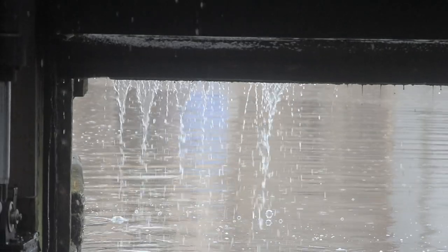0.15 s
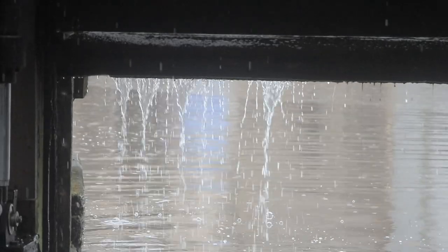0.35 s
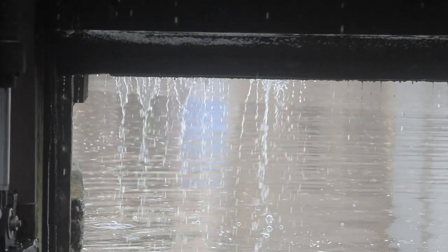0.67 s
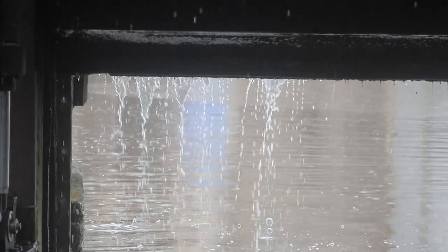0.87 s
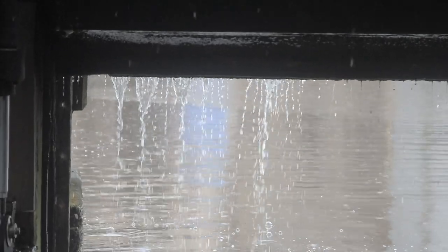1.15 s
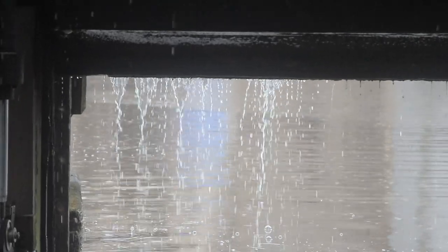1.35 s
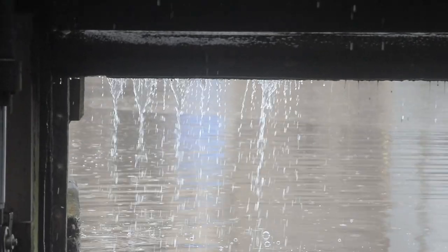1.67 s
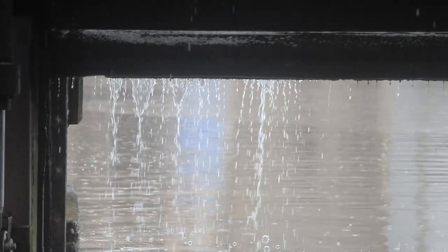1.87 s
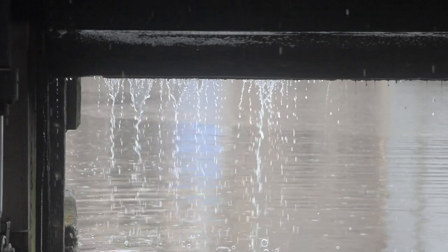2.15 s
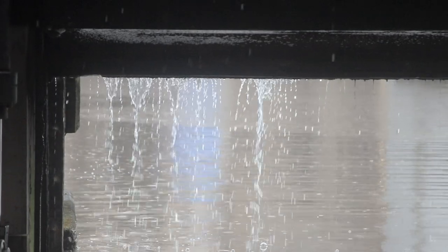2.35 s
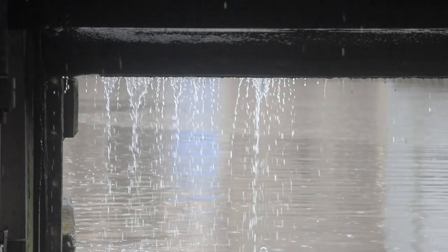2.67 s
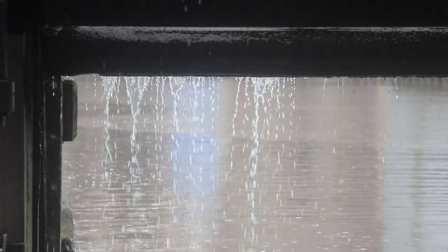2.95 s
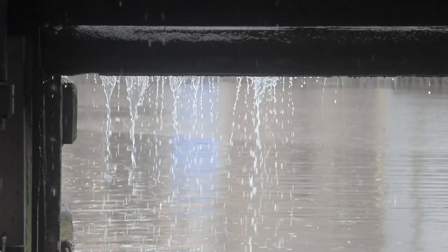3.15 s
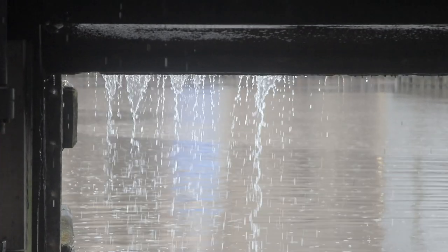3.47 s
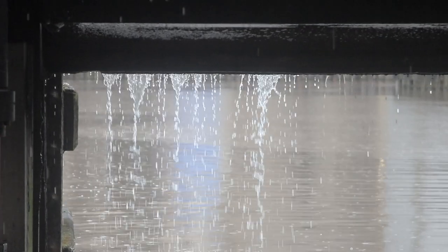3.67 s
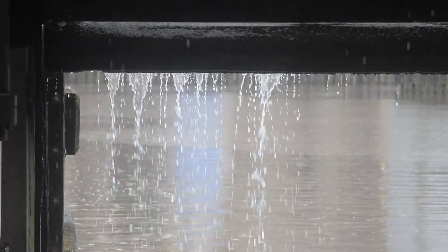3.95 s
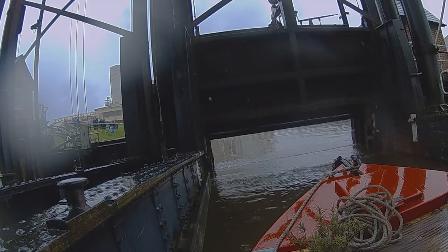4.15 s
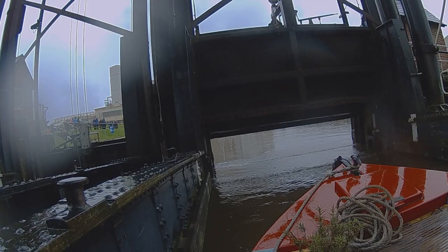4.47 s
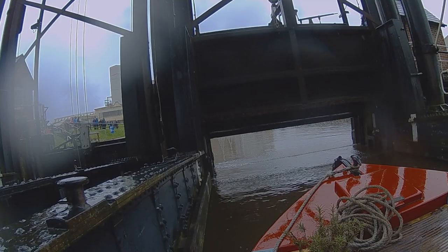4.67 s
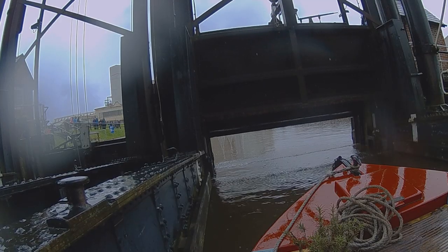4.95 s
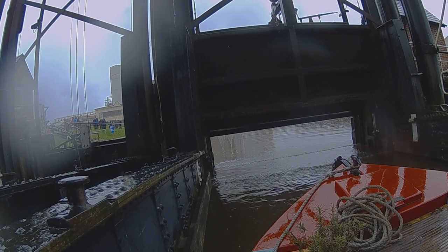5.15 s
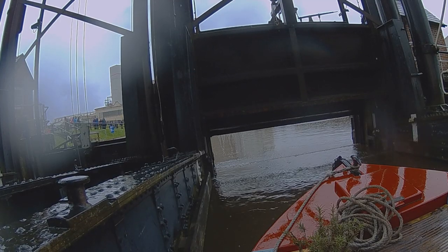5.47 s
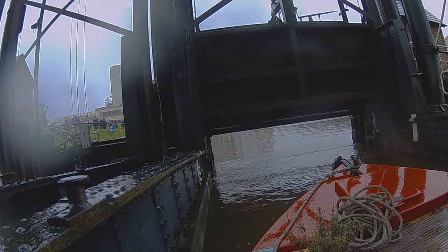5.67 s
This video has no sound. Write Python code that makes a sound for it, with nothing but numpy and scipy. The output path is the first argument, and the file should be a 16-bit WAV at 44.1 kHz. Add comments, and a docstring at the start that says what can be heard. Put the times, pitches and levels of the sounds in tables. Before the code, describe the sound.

Outdoors in rain, a close microphone hears water falling off a gate as a dense, continuous rush with fizzing spray. A tonal machine whine and drone swell gently beneath, with deep soft rumbles and scattered sharp drop clicks. At about 4.1 seconds the level drops instantly; from the deck there remain muffled water, thin rain hiss and a faint steady hum until the end.

```python
"""Lock gate and boat's deck, in the rain

Close to the raised gate, water streams into the river: shaped noise gives roar and spray, short rings bubbles.
The microphone then cuts to a deck further back: a dull wash under fine rain, both shaped noise.
Hydraulic pump and motor hum in both places as sums of sines, over deep noise of unsteady level.
Near drops land as cracks, rings and spatter; a faint electrical whistle is one fluttering sine.
"""
import sys
import numpy as np
from scipy import signal
from scipy.fft import rfft, irfft, next_fast_len
from scipy.io import wavfile
from scipy.ndimage import uniform_filter1d, map_coordinates

SR = 44100
rng = np.random.default_rng(int(sys.argv[2]) if len(sys.argv) > 2 else 0)


def materialize(psi):
    """Save the field psi as 16-bit PCM at rate SR to the path in sys.argv[1].

    A 1-D psi becomes a single channel; in a 2-D psi each row is a channel.
    """
    bounded = np.clip(np.atleast_2d(psi).T, -1, 1)
    quanta = np.round(bounded * 32767).astype(np.int16)
    wavfile.write(sys.argv[1], SR, quanta)


N = 255780
T = np.arange(N) / SR  # seconds

CUT_S = 4.143  # the microphone jumps from the gate to the deck
PUMP_HZ, MAINS_HZ = 246.77, 49.98  # piston rate of the pump; mains frequency at the motor
TOP_HZ = 15720  # band limit of the microphone signal

# Spectrum of the water's roar close to the gate. Each row: frequency in Hz, relative density in dB per Hz.
ROAR_SPECTRUM = [(60, -33), (85, -11), (108, -4.5), (130, -4), (175, -1), (220, 1.5), (290, -3),
                 (420, -9.5), (800, -11.5), (1300, -15), (2000, -37), (4000, -84)]
# Spectrum of the spray close to the gate. Each row: frequency in Hz, relative density in dB per Hz.
SPRAY_SPECTRUM = [(500, -46), (1000, -13), (1500, -0.5), (1900, -3), (2700, -3.5), (3300, -7), (5500, -9.5),
                  (6900, -11.5), (8500, -10), (10700, -19.5), (13700, -19), (14500, -28), (16000, -23)]
# Spectrum of the water's wash from the deck. Each row: frequency in Hz, relative density in dB per Hz.
WASH_SPECTRUM = [(40, -30), (85, -7.5), (165, 0.5), (280, -0.5), (380, -8), (560, -5.5), (850, -7),
                 (1150, -9.5), (1450, -20.5), (2500, -51), (5000, -90)]
# Spectrum of the rain from the deck. Each row: frequency in Hz, relative density in dB per Hz.
RAIN_SPECTRUM = [(800, -21), (1500, 0), (2450, -4.5), (3000, -13), (3800, -6), (4900, -13), (5500, -9.5),
                 (7000, -12), (8200, -21), (10200, -21), (11700, -16.5), (12700, -29), (15500, -25)]
# Drops near the microphone.
# Each row: start in seconds, peak of the ring in dB, pitch in Hz, splash against the ring in dB.
NEAR_DROPS = [(.165, -29, 6800, -9), (0.4187, -22.5, 2900, -10), (.4215, -26, 5000, -9),
              (.426, -23, 3400, -14), (1.2077, -23, 7550, -16), (1.243, -30.5, 3200, -7),
              (1.665, -23.5, 1450, -14), (2.1885, -26, 6500, -18), (2.2226, -22, 4300, -8),
              (2.2228, -24, 8000, -16), (2.8623, -23.5, 3250, -11), (2.8658, -20, 1450, -13),
              (2.8665, -31, 9000, -12), (3.4525, -28, 12700, -18), (3.508, -27.5, 5800, -10),
              (4.6183, -32.5, 2710, -17), (4.655, -45, 2100, -8), (5.53, -45, 12000, -16)]
# Steady harmonics of the pump. Each row: multiple of the piston rate, level at the gate in dB, on deck in dB.
PUMP_HARMONICS = [(1, -41, -38.7), (2, -49, -55.5), (4, -53.5, -64), (5, -53.5, -63.5)]
# Magnetic hum and whine of the motor. Each row: multiple of the mains, level at the gate in dB, on deck in dB.
MOTOR_LINES = [(8, -58, -64), (12, -49, -58), (14, -57, -66), (18, -53, -55), (19, -57, -66),
               (48, -60, -76), (54, -62, -79), (132, -66, -81), (144, -63, -80), (150, -66, -90),
               (156, -67, -83), (192, -66, -92), (204, -71, -91), (246, -74, -95)]
# Spectrum of the deep noise. Each row: frequency in Hz, relative density in dB per Hz.
DEEP_SPECTRUM = [(10, -24), (25, -15), (40, -8), (57, 0.5), (75, -11.5), (100, -12), (200, -43),
                 (500, -100)]
# Swells in the level of the deep noise. Each row: time of the peak in seconds, rise in dB.
DEEP_SWELLS = [(.9, 4), (1.97, 7), (3.88, 6.5), (5.57, 9)]


def gate_water():
    """Close to the gate, streams break up on the river: roar, spray, ringing bubbles and ticks of single drops."""
    roar_db = -31 + 0.59 * wobble(7.14)
    roar = amp(roar_db) * coloured(churn(patchy_db=0.28), ROAR_SPECTRUM)

    impacts = patter(rate=1500, spread_db=1.5, t60=.003)
    spray_db = -36.5 + 0.32 * wobble(14)
    spray = amp(spray_db) * coloured(churn(patchy_db=1.0) + amp(-6.5) * impacts, SPRAY_SPECTRUM)

    plinks = bubbles(rate=320, centre_hz=2108, octaves=.65, cycles=14.0, spread_db=4.0, rise=0.12)
    fizz = bubbles(rate=400, centre_hz=5570, octaves=0.555, cycles=12.5, spread_db=3.5, rise=.05)
    ticks = patter(rate=25, spread_db=3, t60=.007)
    return roar + spray + amp(-46.0) * plinks + amp(-50.5) * fizz + amp(-59.5) * ticks


def deck_water():
    """From the deck further back, the streams are a dull wash with fine rain over it."""
    wash_db = -41.5 + 0.77 * wobble(4.5)
    wash = amp(wash_db) * coloured(churn(patchy_db=1.0), WASH_SPECTRUM)
    impacts = patter(rate=900, spread_db=3.5, t60=.003)
    rain = coloured(churn(patchy_db=1.2) + amp(-8.5) * impacts, RAIN_SPECTRUM)
    return wash + amp(-52) * rain


def near_drops():
    """A drop lands close by: a crack, a short ring, then droplets spatter around the same pitch."""
    crack_db, crack_t60_s, crack_hz = -6, 0.0069, 8000  # level before its treble rolls off at crack_hz
    ring_cycles = 30  # the ring dies by 60 dB in this many cycles
    splash_t60_s, splash_octaves = 0.091, 0.64  # life, and half-width of the band
    spatter_db, spatter_rate = 4, 700  # scatter of the spatter's level, random levels a second
    out, t = np.zeros(N + SR), np.arange(SR // 8) / SR
    for start_s, db, pitch_hz, splash_db in NEAR_DROPS:
        crack = filtered(rng.standard_normal(len(t)), lambda hz: 1 / np.hypot(1, (hz / crack_hz) ** 2))
        crack = crack * amp(crack_db - 60 * t / crack_t60_s)

        ring = np.sin(2 * np.pi * pitch_hz * t) * amp(-60 * pitch_hz * t / ring_cycles)

        droplet_db = spatter_db * map_coordinates(rng.standard_normal(len(t)), [t * spatter_rate])
        spatter = rng.standard_normal(len(t)) * amp(droplet_db)
        band = lambda hz: np.exp(-(np.log2((hz + 1) / pitch_hz) / splash_octaves) ** 2)
        splash = unit(filtered(spatter, band)) * amp(splash_db - 60 * t / splash_t60_s)

        out[round(start_s * SR):][:len(t)] += amp(db) * (crack + ring + splash)
    return out[:N]


def pump(at_gate):
    """The pump whines on its third piston harmonic, swelling and throbbing, over steadier harmonics."""
    whine_db = heard(at_gate, -28.5, -40) + swell(peak_s=2.17, length_s=6.5, depth_db=4.5)
    throb_db = 0.5 * np.sin(2 * np.pi * 2.67 * T)
    out = tone(3 * PUMP_HZ, whine_db + throb_db, waver_db=0.2, drift=.04)
    for order, gate_db, deck_db in PUMP_HARMONICS:
        out += tone(round(order) * PUMP_HZ, heard(at_gate, gate_db, deck_db), waver_db=0.3, drift=0.063)
    return out


def motor(at_gate):
    """The motor drones on the sixth and seventh multiples of the mains, in one deep swell, over weaker lines."""
    drone_db = heard(at_gate, -27.5, -39.5) + swell(peak_s=3.12, length_s=6.8, depth_db=18)
    upper_db = drone_db + heard(at_gate, -7.5, -16)
    out = tone(6 * MAINS_HZ, drone_db, waver_db=0.15, drift=0.046)
    out += tone(7 * MAINS_HZ, upper_db, waver_db=0.1, drift=0.055)
    for order, gate_db, deck_db in MOTOR_LINES:
        level_db = heard(at_gate, gate_db, deck_db)
        out += tone(round(order) * MAINS_HZ, level_db, waver_db=1.5, drift=0.38 + order / 150)
    return out


def deep_noise(at_gate):
    """Deep noise of unsteady level, far stronger at the gate."""
    width_s = 0.1  # from a swell's peak to 1/e of its rise in dB, either side
    swell_db = sum(db * np.exp(-((T - s) / width_s) ** 2) for s, db in DEEP_SWELLS)
    level_db = heard(at_gate, -43, -56.5) + swell_db + 1.1 * wobble(6.1)
    return amp(level_db) * coloured(rng.standard_normal(N), DEEP_SPECTRUM)


def thin_whistle():
    """A faint electrical whistle: one high sine whose level flutters fast."""
    flutter = 1 + .7 * np.sin(2 * np.pi * 54 * T)
    return flutter * tone(13750, -74, waver_db=.3, drift=.1)


def churn(patchy_db):
    """Churned water: noise whose bands swell and sink in small patches of time and frequency."""
    z = signal.stft(rng.standard_normal(N), nperseg=512)[2]
    field = uniform_filter1d(rng.standard_normal(z.shape), size=12, axis=0)  # across frequency
    field = uniform_filter1d(field, size=9, axis=1)  # across time
    return unit(signal.istft(z * amp(patchy_db * unit(field)), nperseg=512)[1][:N])


def patter(rate, spread_db, t60):
    """Impacts of drops, rate a second: tiny broadband cracks that die by 60 dB in t60 seconds."""
    count, t = int(rate * N / SR), np.arange(SR // 150) / SR
    cracks = amp(-60 * t / t60) * rng.standard_normal((count, len(t)))
    return scatter(sizes(count, spread_db) * cracks)


def bubbles(rate, centre_hz, octaves, cycles, spread_db, rise):
    """Trapped air rings for some cycles, its pitch rising as it nears the surface."""
    count, t = int(rate * N / SR), np.arange(SR // 50) / SR
    hz = np.clip(centre_hz * 2 ** (octaves * rng.standard_normal((count, 1))), 400, 11000)
    age = hz * t / cycles
    phase = 2 * np.pi * hz * t * (1 + rise * np.minimum(age, 2) / 2)
    envelope = np.exp(-2 * age) * (1 - np.exp(-2 * hz * t))  # decay, softened onset
    return scatter(sizes(count, spread_db) * np.sin(phase) * envelope)


def sizes(count, spread_db):
    """Gains for many small drops and few large ones."""
    return amp(spread_db * np.minimum(rng.exponential(size=(count, 1)), 4))


def scatter(grains):
    """Each row is dropped at a random moment; rms 1."""
    at = rng.integers(0, N, len(grains))[:, None] + np.arange(grains.shape[1])
    return unit(np.bincount(at.ravel(), grains.ravel(), N)[:N])


def tone(hz, db, waver_db, drift):
    """One sine at an rms level in dB, slightly unsteady in level and phase (drift in radians)."""
    phase = 2 * np.pi * (hz * T + rng.random()) + drift * wobble(3.94)
    return np.sqrt(2) * amp(db + waver_db * wobble(6)) * np.sin(phase)


def swell(peak_s, length_s, depth_db):
    """Level in dB of one smooth rise and fall: 0 at its peak, depth_db lower outside it."""
    rise = np.cos(np.pi * np.clip((T - peak_s) / length_s, -.5, .5)) ** 2
    return 20 * np.log10(rise + (1 - rise) * amp(-depth_db))


def heard(at_gate, gate_db, deck_db):
    """Level in dB where the microphone stands: at_gate is 1 at the gate, 0 on deck."""
    return deck_db + at_gate * (gate_db - deck_db)


def wobble(rate):
    """A smooth random curve, rate knots a second."""
    return map_coordinates(rng.standard_normal(int(N * rate / SR) + 4), [T * rate])


def coloured(x, spectrum):
    """x shaped by (Hz, dB) points on a log axis, at rms 1."""
    f, db = np.transpose(spectrum)
    return unit(filtered(x, lambda hz: amp(np.interp(np.log(hz + 1), np.log(f), db))))


def filtered(x, response):
    """x with its spectrum multiplied by a function of frequency in Hz."""
    m = next_fast_len(len(x) + 8192)
    return irfft(rfft(x, m) * response(np.fft.rfftfreq(m, 1 / SR)), m)[:len(x)]


def unit(x):
    """x scaled to rms 1."""
    return x / np.sqrt(np.mean(x ** 2) + 1e-20)


def amp(db):
    """Decibels to gain."""
    return 10 ** (np.asarray(db) / 20)


def scene():
    """The gate close by, then the deck, with a crossfade of a few milliseconds at the cut."""
    at_gate = np.clip((CUT_S - T) / 0.0089 + .5, 0, 1)
    water = at_gate * gate_water() + (1 - at_gate) * deck_water()
    machine = pump(at_gate) + motor(at_gate)
    return (water + near_drops() + machine + deep_noise(at_gate) + thin_whistle())[None]


def record(dry):
    """The microphone signal keeps nothing above the band limit."""
    return filtered(dry[0], lambda hz: hz < TOP_HZ)[None]


dry = scene()
out = record(dry)
materialize(out)
```